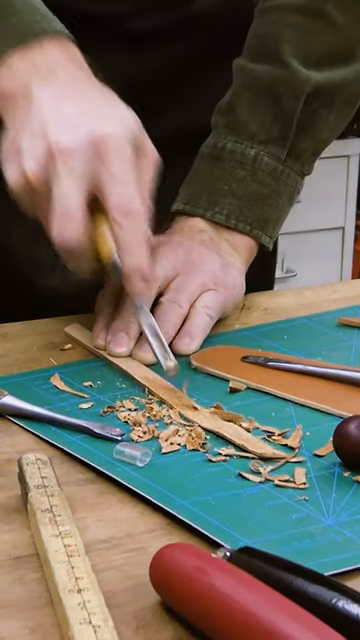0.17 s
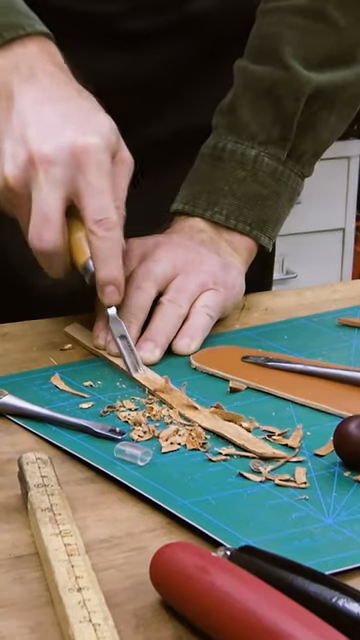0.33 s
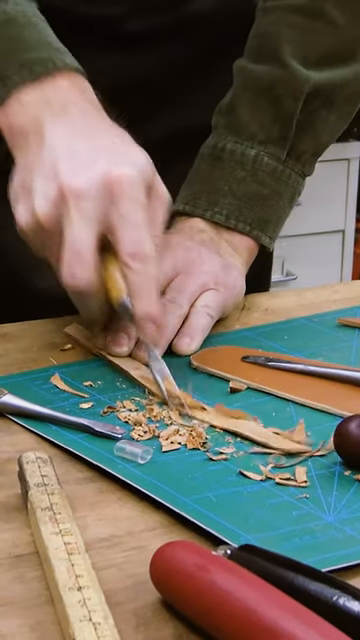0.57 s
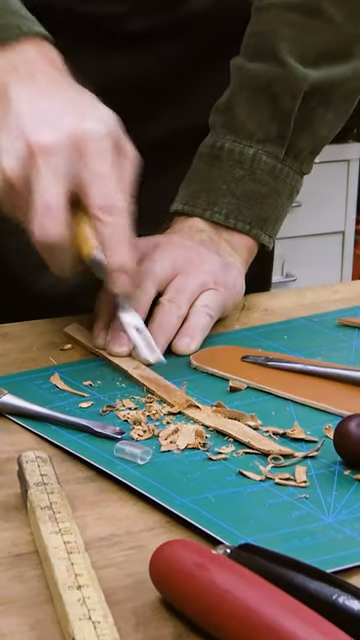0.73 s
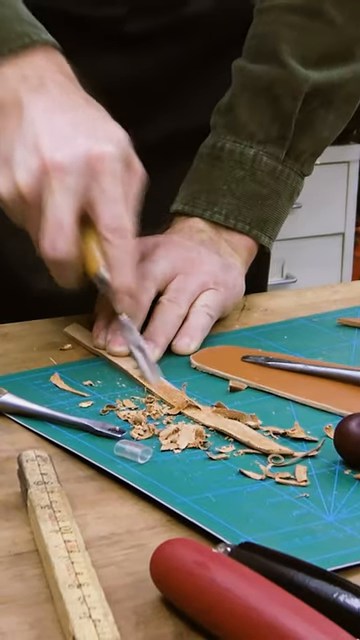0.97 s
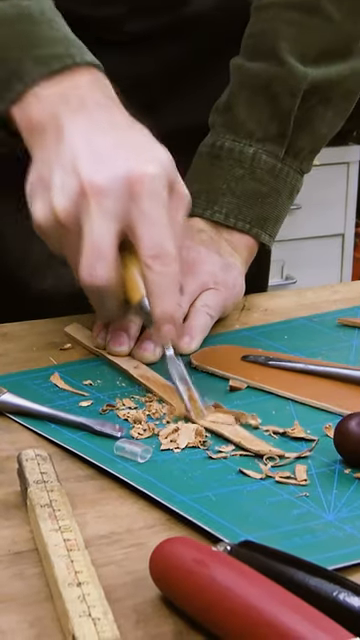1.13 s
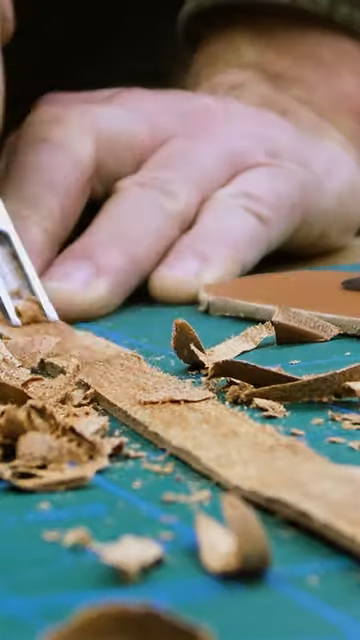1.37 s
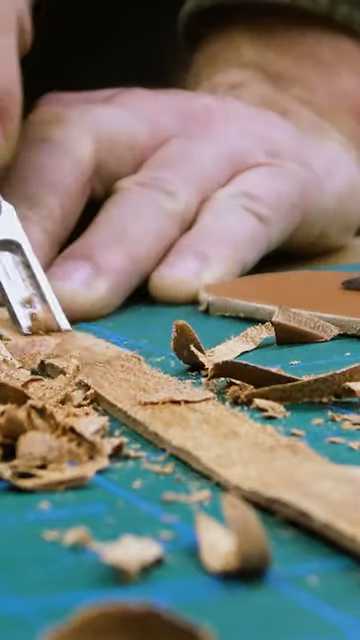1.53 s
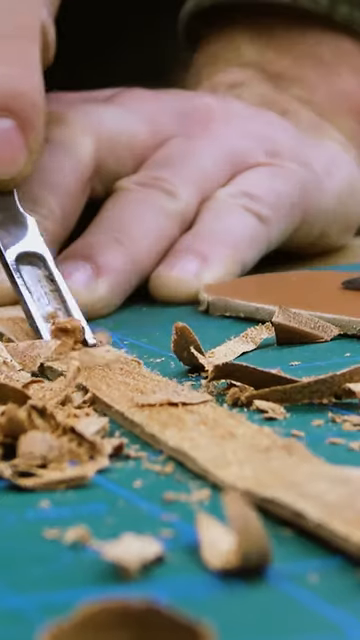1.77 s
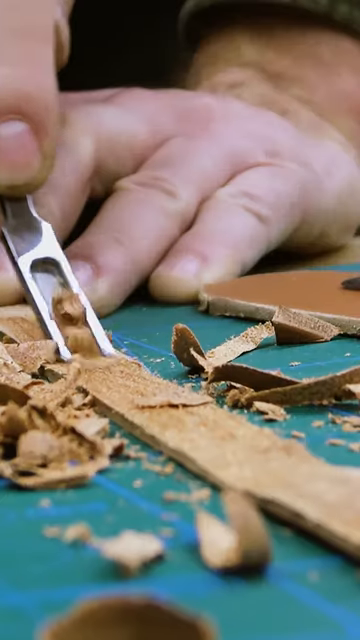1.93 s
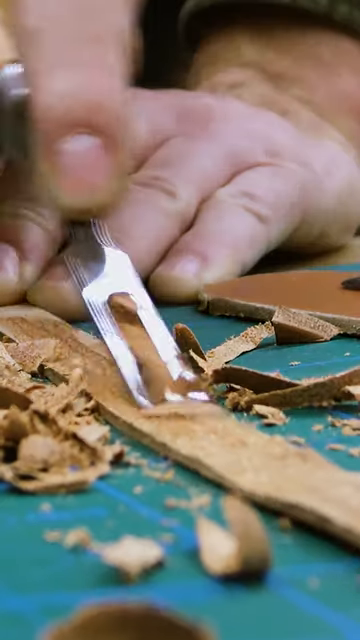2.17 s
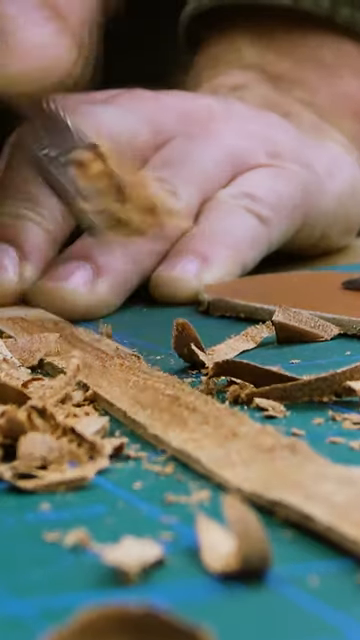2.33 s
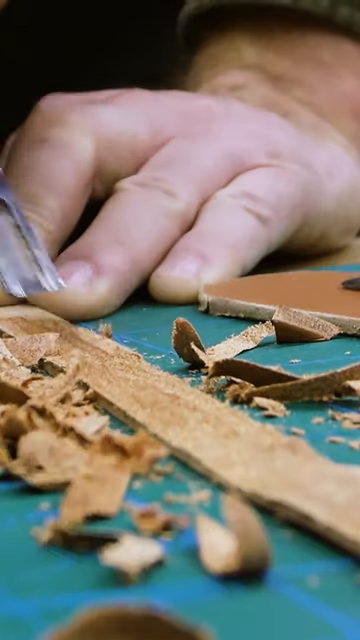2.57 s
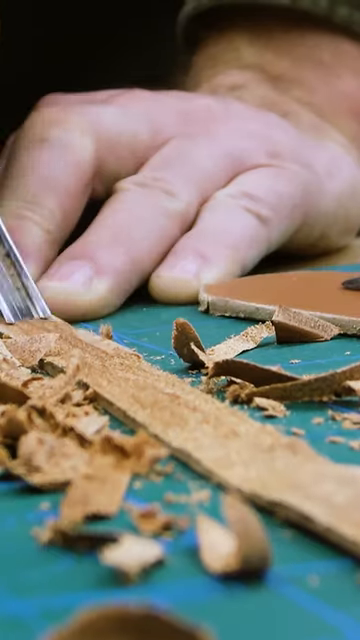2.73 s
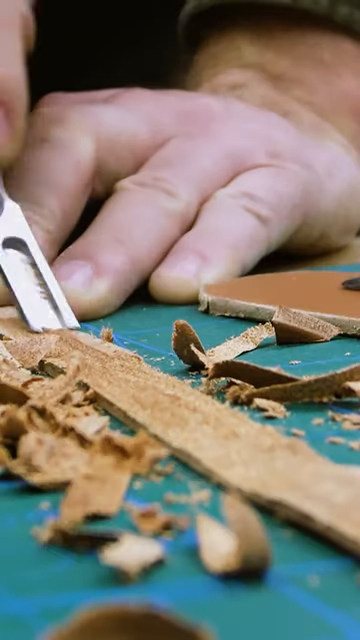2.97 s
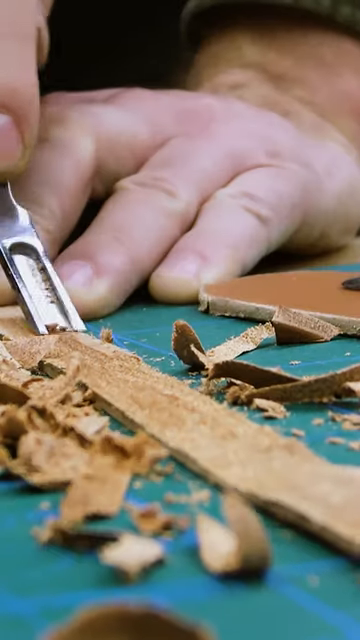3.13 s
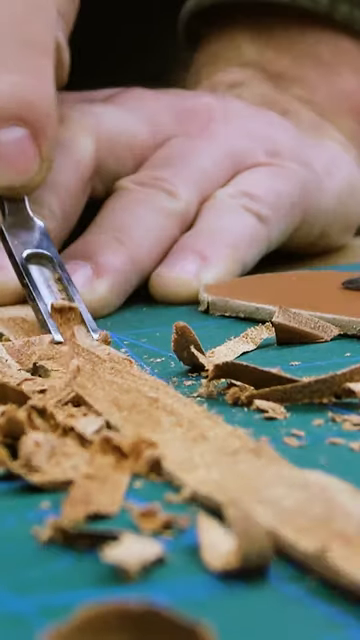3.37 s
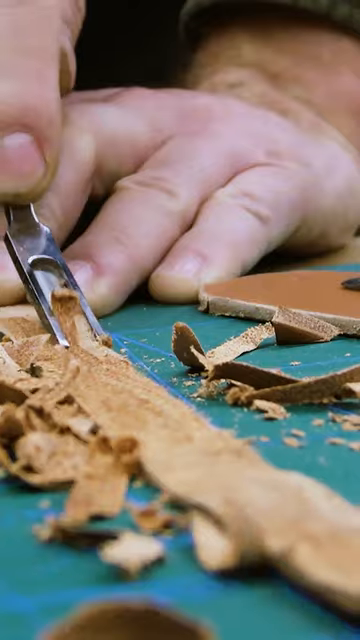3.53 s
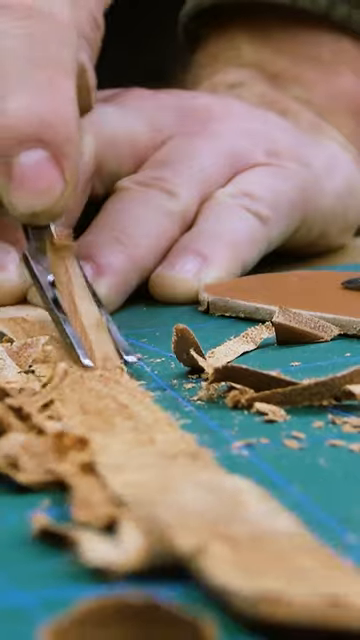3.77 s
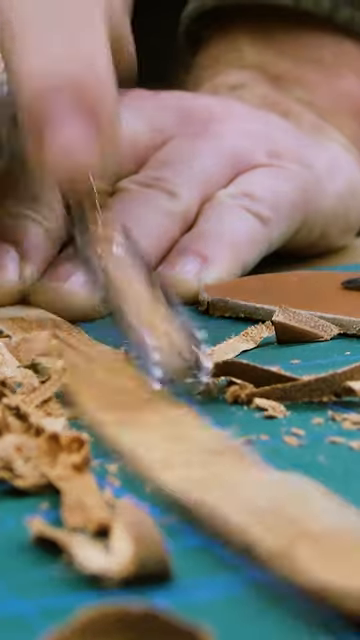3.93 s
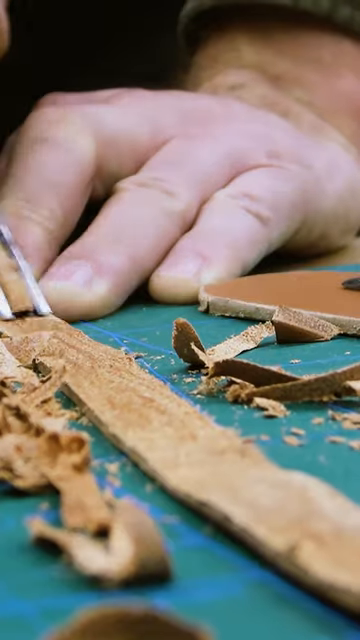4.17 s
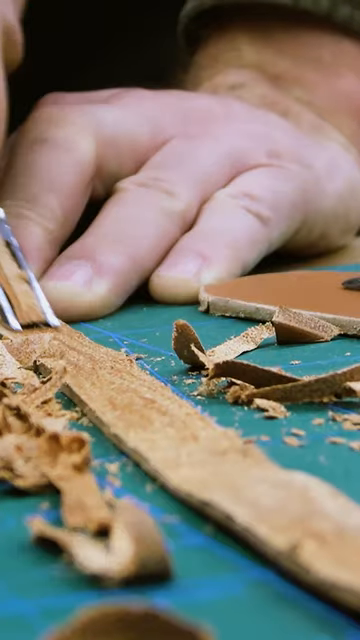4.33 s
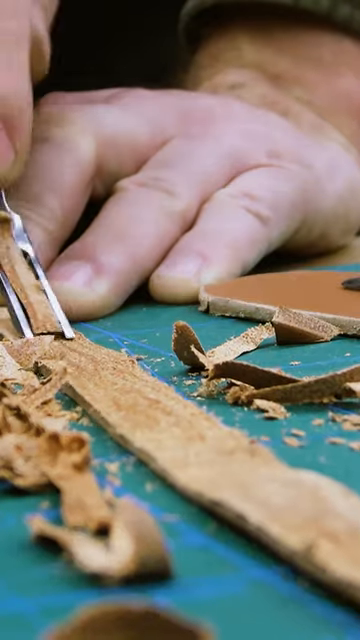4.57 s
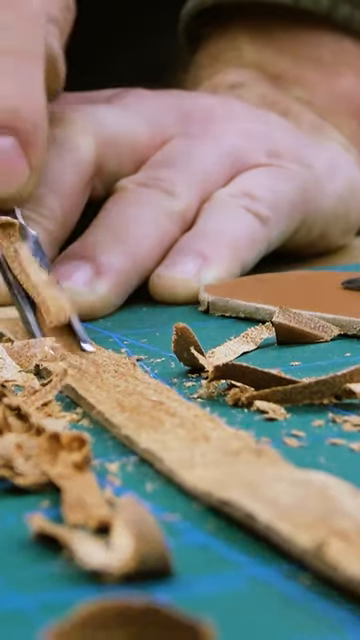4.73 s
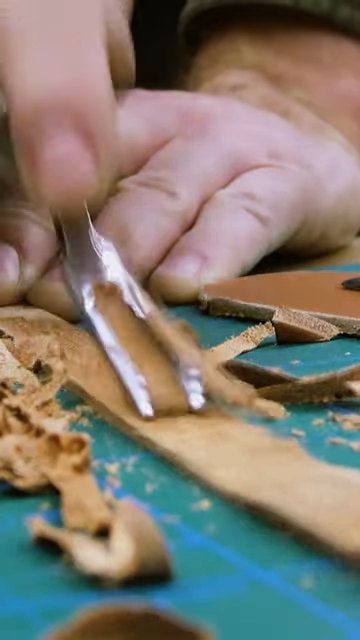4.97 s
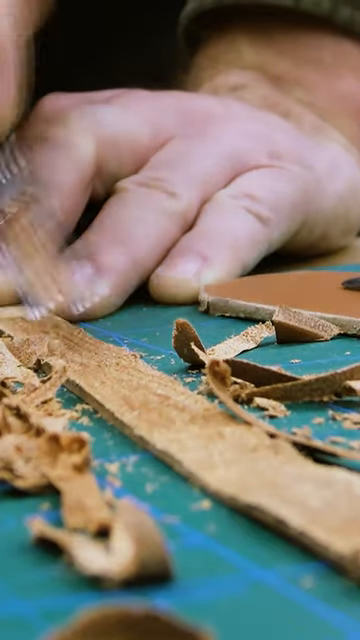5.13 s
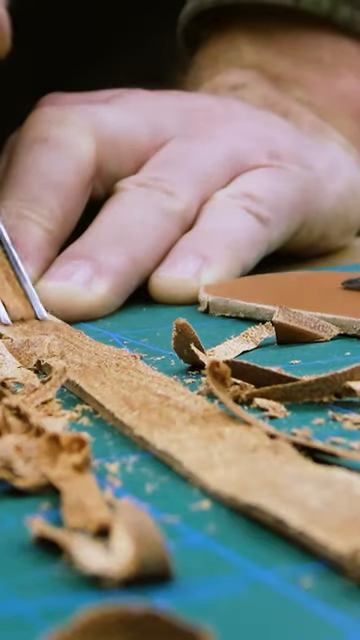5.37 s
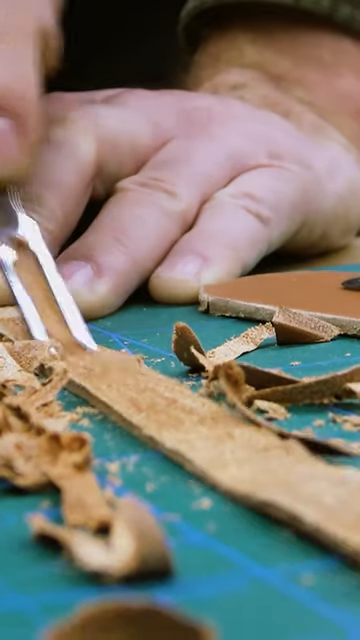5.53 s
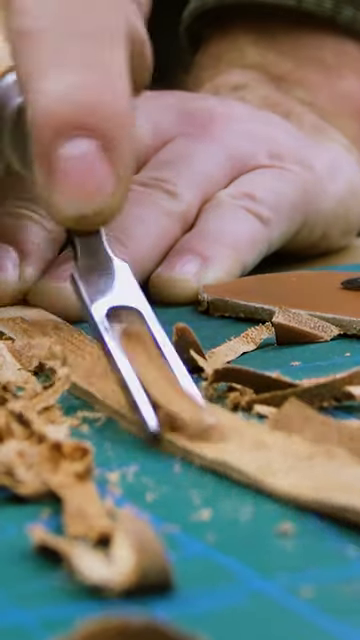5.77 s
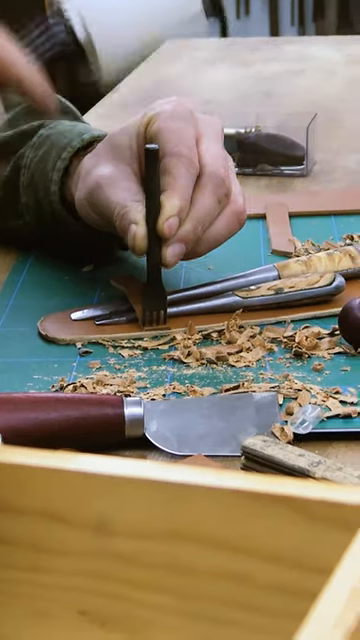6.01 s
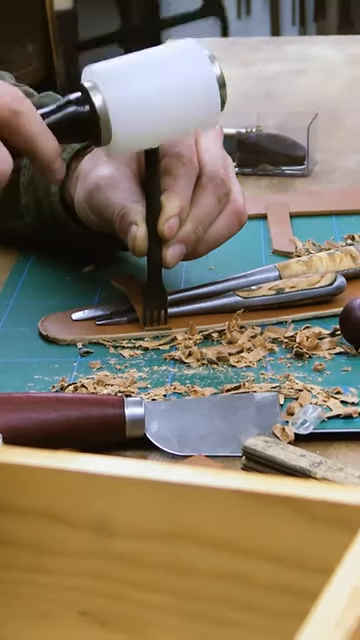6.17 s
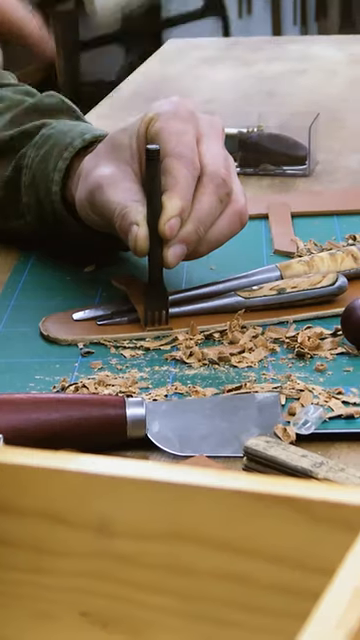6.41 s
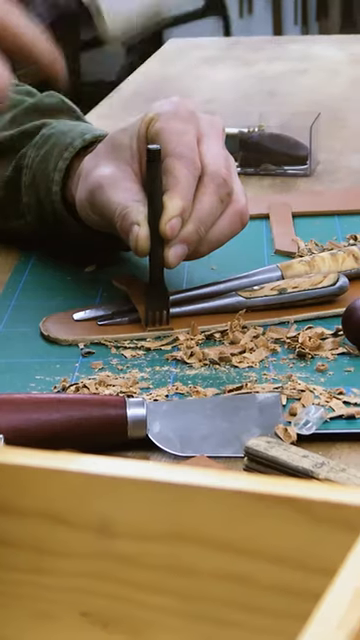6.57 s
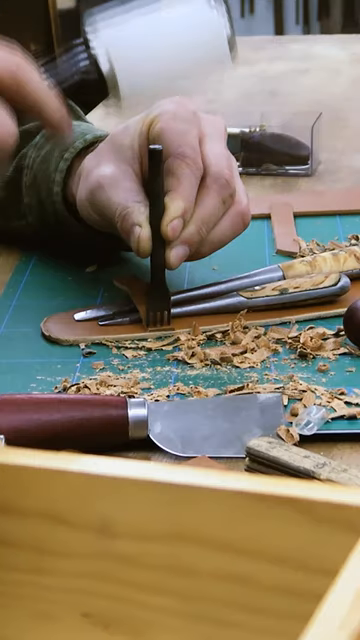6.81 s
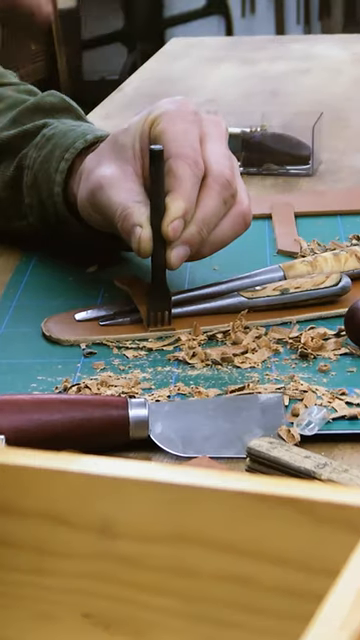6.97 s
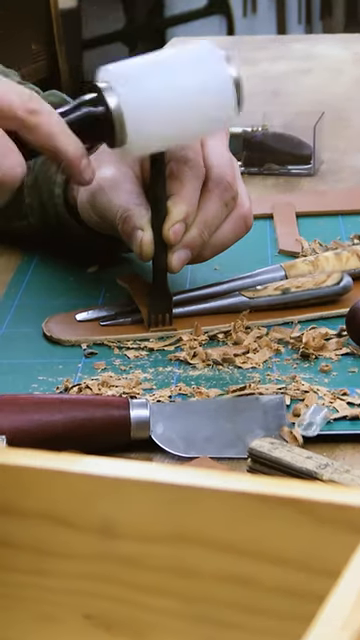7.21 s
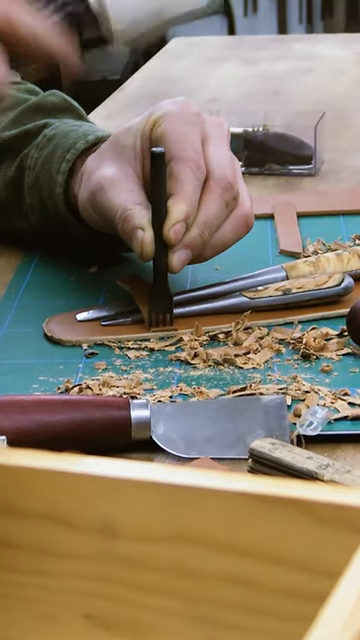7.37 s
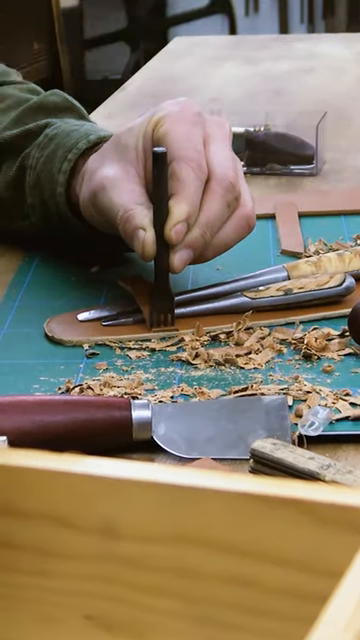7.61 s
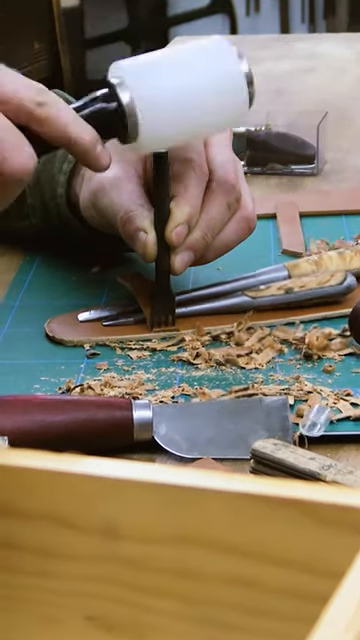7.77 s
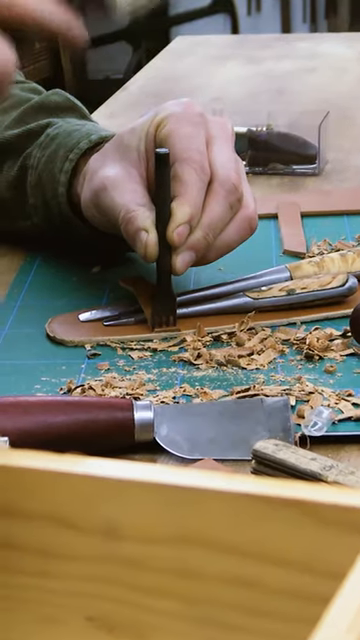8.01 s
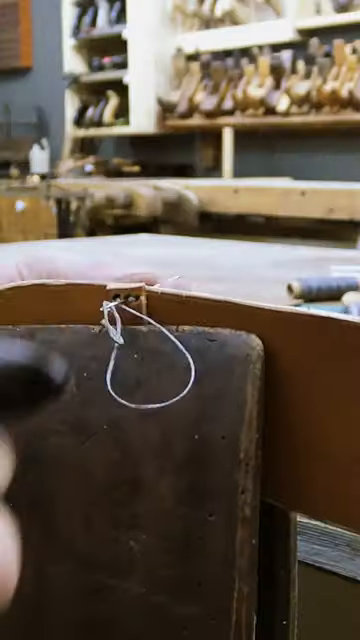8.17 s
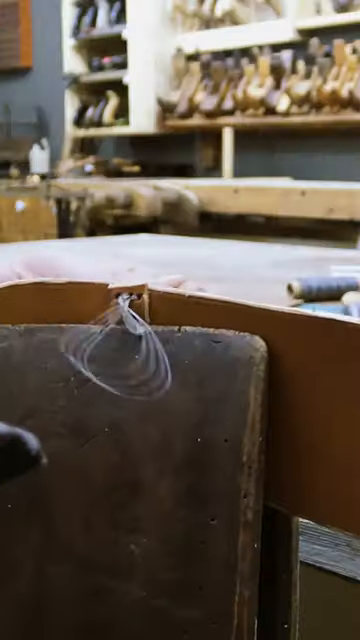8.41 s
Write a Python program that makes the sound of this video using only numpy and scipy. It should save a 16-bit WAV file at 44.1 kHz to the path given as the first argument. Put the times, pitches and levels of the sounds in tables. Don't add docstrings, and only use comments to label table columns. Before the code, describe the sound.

Three quick leather rasps and four longer, softer scrapes, then four increasingly hard mallet blows boom through a wooden bench with ringing steel tools.

```python
import sys
import numpy as np
from scipy import signal
from scipy.fft import rfft, irfft, next_fast_len
from scipy.io import wavfile
from scipy.ndimage import uniform_filter1d, minimum_filter1d, map_coordinates

SR = 44100
rng = np.random.default_rng(int(sys.argv[2]) if len(sys.argv) > 2 else 0)


def elevation(decibels):
    levels = np.asarray(decibels, float)
    return 10 ** (levels / 20)


def transcribe(signal):
    frames = np.atleast_2d(signal).T
    limited = np.clip(frames, -1, 1)
    pcm = np.round(limited * 32767).astype(np.int16)
    wavfile.write(sys.argv[1], SR, pcm)


N = 371763
REPEAT = round(.0532 * SR)


def unit(x):
    return x / np.sqrt(np.mean(x ** 2) + 1e-20)


def along(points, hz):
    f, v = np.transpose(points)
    return np.interp(np.log(hz + 1), np.log(f + 1), v)


def wobble(rate):
    at = np.arange(0, N + 32, 32)
    knots = rng.standard_normal(int(N * rate / SR) + 4)
    return np.interp(np.arange(N), at, map_coordinates(knots, [at * rate / SR]))


def add(track, s, x):
    part = track[round(s * SR):][:len(x)]
    part += x[:len(part)]


def room_tail():
    # frequency in Hz, t60 in seconds.
    decay = [(300, 1), (2000, 0.24), (8000, 0.2)]
    hz, t, z = signal.stft(rng.standard_normal(SR // 2), SR, nperseg=256)
    z = z * elevation(-60 * t / along(decay, hz)[:, None])
    tail = signal.istft(z, SR, nperseg=256)[1]
    return np.pad(tail / np.linalg.norm(tail), (130, 0))


def air():
    # frequency in Hz, level in dB.
    noise_colour = [(15, -47), (25, 3), (102, 1), (352, -1), (1150, -4.5), (1980, -8.5), (2330, -7),
                    (2520, -8), (3680, -8.5), (4450, -8), (14200, -14.5), (15800, -8.5)]
    # time in seconds, hush in dB, hiss in
    # dB.
    noise_steps = [(0, -52, -59), (2.7, -57.5, -59.5), (6.085, -57, -59.5), (6.09, -60.5, -59),
                   (8.24, -54, -59), (8.245, -57.5, -59), (8.43, -57, -55)]
    m = next_fast_len(N)
    hz = np.fft.rfftfreq(m, 1 / SR)
    z = rfft(rng.standard_normal(m)) * elevation(along(noise_colour, hz))
    low = 1 / (1 + (hz / 2200) ** 4)
    s, hush_db, hiss_db = np.transpose(noise_steps)
    t = np.arange(N) / SR
    hush = unit(irfft(z * low, m)[:N]) * elevation(np.interp(t, s, hush_db) + 2.3 * wobble(7.9))
    hiss = unit(irfft(z * (1 - low), m)[:N]) * elevation(np.interp(t, s, hiss_db))
    return hush + hiss


def steel():
    # start in seconds, frequency in
    # Hz, level in dB, rise in seconds, t60 in seconds.
    rings = [(6.18, 6430, -34, 0.0036, 0.11), (6.19, 8000, -40, .004, .12), (6.236, 6430, -30, .003, 0.087),
             (6.236, 8130, -36, .003, 0.14), (6.745, 6430, -28, 0.0053, 0.1),
             (6.797, 8100, -36, 0.0044, 0.27), (6.801, 8102, -58, .015, 1), (6.81, 6400, -39, .01, 0.22),
             (6.81, 11600, -63, .03, 1), (7.27, 8350, -44, .004, 0.56), (7.31, 6430, -28.5, 0.0074, 0.15),
             (7.319, 8350, -30, 0.0025, 0.43), (7.32, 11499, -45, .09, 0.67), (7.32, 11676, -43, 0.1, 0.93),
             (0.227, 4640, -46, .002, 0.23), (0.843, 4720, -49, .002, 0.22), (7.35, 7682, -42, .02, 0.51),
             (7.425, 7682, -41, 0.0091, 0.24), (7.85, 8349, -56, .01, 0.46),
             (7.919, 8349, -44.5, 0.018, 0.75), (8.045, 4716, -47, 0.025, 0.42),
             (7.34, 4716, -34, 0.042, 0.7),
        (7.41, 4716, -30, .04, .28),
    ]
    # start in seconds, frequency in Hz, level in dB, rise in seconds, t60 in seconds.
    room_modes = [(1.139, 70, -37, 0.026, 0.48), (3.83, 59, -34, .03, .3), (4.9, 58, -42, .04, .5),
                  (5.68, 59.7, -42, .05, .5), (6.2, 71.7, -32, 0.046, 0.73), (6.75, 70, -26, 0.064, 0.76),
                  (7.249, 70, -20.5, 0.18, 0.94), (7.85, 70.6, -25, 0.15, 1), (7.861, 112.5, -26, 0.11, 1)]
    out, t = np.zeros(N), np.arange(SR) / SR
    for s, hz, db, rise, t60 in rings + room_modes:
        envelope = elevation(db - 60 * t / t60) * (1 - np.exp(-t / rise))
        add(out, s, envelope * np.sin(2 * np.pi * hz * (s + t)))
    return out * elevation(1.0 * wobble(50))


def singing():
    # start in seconds, length in seconds, frequency in Hz, width in Hz, level in dB.
    sings = [(1.43, .14, 6050, 500, -60), (1.65, 0.093, 7000, 1000, -53), (1.696, 0.14, 8500, 150, -65),
             (1.86, 0.4, 7060, 600, -54), (2.93, 0.091, 6060, 500, -60), (3.28, 0.13, 7000, 900, -58),
             (3.6, 0.31, 6630, 900, -52), (4.405, 0.09, 7200, 700, -57), (4.42, 0.19, 1580, 90, -46),
             (4.56, .1, 7000, 500, -58), (4.682, 0.24, 7000, 700, -46), (4.743, 0.18, 960, 250, -38),
             (5.443, .11, 6100, 400, -56), (5.478, 0.065, 7560, 900, -54), (5.566, 0.14, 5950, 500, -49),
             (5.578, 0.17, 7340, 600, -48), (5.63, .3, 925, 250, -38), (5.935, 0.045, 850, 200, -49),
             (5.935, 0.061, 1560, 250, -46), (5.973, .07, 1890, 900, -51), (3.282, .4, 2880, 1510, -58),
             (4.7, 0.17, 3630, 1800, -49), (5.47, .12, 3000, 900, -53), (0.474, 0.19, 4500, 3000, -46),
             (6.016, 0.037, 850, 200, -51), (6.041, .038, 2220, 500, -55)]
    # start in seconds, length in seconds,
    # frequency in Hz, width in Hz, level in dB.
    swells = [(6.74, 0.15, 744, 130, -25), (7.222, 0.035, 6450, 600, -36), (7.3, .17, 740, 94, -28.5),
              (7.33, 0.13, 295, 67, -30), (7.86, .09, 390, 54, -24), (7.9, 0.14, 291, 38, -24.5),
              (7.88, .16, 568, 90, -24.5), (7.9, 0.032, 7400, 250, -46), (7.3, 0.034, 8000, 250, -40),
              (8.1, .14, 252, 52, -38), (8.03, 0.11, 316, 29, -33), (6.86, .13, 1130, 1100, -40),
              (6.85, .13, 590, 150, -36), (7.24, .1, 1050, 330, -34)]
    rise, fall = 0.33, 0.1
    out = np.zeros(N)
    for s, length, hz, width, db in sings + swells:
        u = np.arange(round(length * SR)) / (length * SR)
        rub = rng.standard_normal(SR // 2) * elevation(6.4 * rng.standard_normal(SR // 2))
        band = [hz - width / 2, hz + width / 2]
        rub = signal.sosfilt(signal.butter(2, band, "band", fs=SR, output="sos"), rub)
        envelope = np.clip(np.minimum(u / rise, (1 - u) / fall), 0, 1)
        add(out, s, elevation(db) * unit(rub)[-len(u):] * envelope)
    return out


def tap(hz, t60, wide):
    t = np.arange(1024) / SR
    modes = np.sin(2 * np.pi * hz * t) + 0.36 * np.sin(2 * np.pi * 1.19 * hz * t)
    scuff = 0.46 * rng.standard_normal(len(t))
    push = elevation(-60 * t / t60) * (1 - np.exp(-t / 0.00031)) * (modes + scuff)
    band = [hz / wide, min(1.37 * hz * wide, 20000)]
    ring = signal.sosfilt(signal.butter(3, band, "band", fs=SR, output="sos"), push)
    return ring / np.abs(ring).max()


def tool_hops():
    # start in seconds, peak in dB, frequency in Hz, t60 in seconds.
    hops = [(6.176, -29, 2440, 0.0075), (4.205, -43, 2500, .006), (4.205, -39, 550, .02),
            (4.258, -44, 2400, .006), (6.177, -26, 900, .012), (6.184, -24, 796, 0.01),
            (6.8014, -27, 3300, .008), (7.279, -12, 3080, .008), (7.2967, -27, 3200, .01),
            (7.353, -20, 3400, 0.0066), (7.3935, -16, 3030, 0.0092), (7.411, -16, 3100, 0.0087),
            (7.896, -24, 2440, .012), (7.914, -14, 2520, 0.014), (7.952, -18.5, 2450, .01),
            (7.9706, -19.5, 2550, .01)]
    out = np.zeros(N)
    for s, db, hz, t60 in hops:
        add(out, s, elevation(db) * tap(hz, t60, wide=1.4))
    return out


def light_contacts():
    # start in seconds, peak in dB, frequency in Hz, t60 in seconds, room in dB.
    knocks = [(0.401, -43, 1470, .008, -12), (0.6348, -10, 1710, 0.003, -6),
              (0.6865, -2.5, 1760, 0.0035, -7.5), (.6897, -13, 1700, 0.0068, -16),
              (.6976, -13, 1640, 0.0033, -14), (3.383, -29, 910, .008, -10), (2.513, -38, 1450, .01, 2),
              (0.918, -30, 1470, 0.0049, -10), (0.97, -24.5, 1470, 0.0067, -2),
              (2.349, -22.5, 1460, 0.012, -21), (2.401, -27.5, 1520, 0.016, -8),
              (2.756, -39, 1510, 0.0098, -19), (2.808, -43, 1470, 0.018, -5),
              (4.205, -30, 1370, 0.015, -15), (4.258, -34, 1470, 0.011, 0), (4.953, -29, 1530, 0.0055, 3),
              (5.027, -27, 1510, 0.011, -7), (5.083, -31, 1530, 0.017, -7), (5.938, -33, 1520, 0.0088, -2)]
    # start in seconds, peak in dB, frequency in Hz, t60 in seconds, room in dB.
    tinks = [(0.227, -16, 4830, 0.0015, 3), (0.7901, -24, 4690, 0.003, 5), (0.843, -22, 4800, 0.0026, 2.3),
             (8.1708, -34, 6200, 0.0058, 1.5), (8.1908, -38, 3450, .006, 1), (8.224, -35.5, 3800, .008, 3),
             (8.1908, -39, 7200, 0.017, -4), (8.224, -35.0, 5800, 0.0068, 3)]
    # start in seconds, peak in dB, frequency in Hz, t60 in seconds, room in dB.
    snaps = [(0.5064, -26, 2780, 0.0066, 2), (0.61, -13, 1270, 0.0076, -4), (3.843, -38, 7000, .004, -2),
             (3.896, -27, 5750, 0.0025, -0.5), (4.897, -36, 6500, 0.003, -8), (4.95, -33, 6200, 0.0024, -4),
             (.6348, -20.5, 6700, 0.0024, -8), (.6865, -22, 5000, .003, -11),
             (2.1696, -35, 7300, 0.0024, -3), (3.3808, -39, 4800, 0.0024, -6), (2.1, -40, 6900, .004, -5),
             (4.7288, -41, 7010, .003, -6), (2.401, -47, 2200, .004, -8), (.97, -38, 2000, .004, -6),
             (5.4435, -46, 5900, .004, -5)]
    out = np.zeros(N)
    for rows, edge_db, wide, broad in ((knocks, -5, 1.3, 2), (tinks, -17, 1.13, 1.15), (snaps, -6, 1.2, 2.4)):
        for s, db, hz, t60, room_db in rows:
            edge = elevation(edge_db) * tap(1.38 * hz, 0.64 * t60, broad)
            x = elevation(db + 1.5 - max(room_db, 0) * 3.0) * (tap(hz, t60, wide) + edge)
            add(out, s, x)
            add(out, s, elevation(room_db) * signal.fftconvolve(x, room_tail()))
    out[round(6.085 * SR):round(6.17 * SR)] = 0
    return out


def mallet_cracks():
    # start in seconds, peak in dB, frequency in Hz, t60 in seconds, brightness in dB.
    cracks = [(6.173, -14, 1920, .015, -34), (6.225, -11, 2660, 0.0091, -26),
              (6.7245, -14.5, 1850, 0.013, -26), (6.777, -12.5, 2990, 0.0061, -13),
              (7.217, -2, 1870, 0.0074, -6), (7.2172, -7, 4070, .004, -30), (7.217, -18, 6300, .004, -30),
              (7.269, -8, 3380, .006, -3), (7.3182, -15, 3100, 0.008, -14), (7.8127, -2, 1830, 0.0032, -6),
              (7.8132, -18, 4150, .004, -30), (7.864, -9, 2650, 0.0085, -6), (7.864, -19, 7000, .003, -30)]
    out = np.zeros(N)
    for s, db, hz, t60, bright_db in cracks:
        edge = tap(5700, 0.0012, wide=2.5) + elevation(-12) * tap(12900, 0.00066, wide=1.3)
        add(out, s, elevation(db) * (tap(hz, t60, wide=1.8) + elevation(bright_db) * edge))
    return out


def grit(rate, spread_db, smooth, lumpy_db, patchy_db, again):
    size = elevation(spread_db * np.minimum(rng.exponential(size=N), 2))
    slips = (rng.random(N) < rate / SR) * size * rng.standard_normal(N)
    z = signal.stft(unit(slips) + smooth * rng.standard_normal(N), nperseg=512)[2]
    field = rng.standard_normal(z.shape)
    for _ in range(2):
        field = uniform_filter1d(field, size=7, axis=0)
        field = uniform_filter1d(field, size=9, axis=1)
    depth = np.clip(np.arange(len(z)) / 40, .3, .6)[:, None]
    x = signal.istft(z * elevation(patchy_db * depth * unit(field)), nperseg=512)[1][:N]
    x = x * elevation(lumpy_db * (0.06 * wobble(13) + wobble(45)))
    x = x + elevation(-8.0) * signal.fftconvolve(x, room_tail())[:N]
    return x - again * np.roll(x, REPEAT)


def body(drive, colour, modes, broad):
    edges = [0, 235, 800, 1900, 4700, 8800, 22050]
    f = np.fft.rfftfreq(next_fast_len(N + 8192), 1 / SR)
    peaks = sum(elevation(db) * 1j * f * w / (c * c - f * f + 1j * f * w) for c, w, db in modes)
    z = rfft(drive, 2 * len(f) - 2) * elevation(along(colour, f)) * (broad + peaks)
    below = [1 / (1 + (f / (edge + 1)) ** 6) for edge in edges]
    bands = [irfft(z * (hi - lo))[:N] for lo, hi in zip(below, below[1:])]
    bass, low, high, tear, hiss, top = bands
    chatter = elevation(1.45 * wobble(75))
    tear, hiss, top = tear * np.sqrt(chatter), hiss * chatter, top * chatter
    low, high = unit(np.array([low, high])) / np.sqrt(2)
    return [unit(bass), low, high, unit(tear), hiss / hiss.std(), top / hiss.std()]


def played(layers, rows, fade, loud_db):
    s, main_db, tear_db, hiss_db, bass_db, tilt_db = np.transpose(rows)
    span = np.arange(max(0, round((s[0] - .003) * SR)), round((s[-1] + .002) * SR))
    slack = main_db - loud_db
    tilt = fade[0] * slack + tilt_db
    rels = (bass_db, -tilt, tilt, tear_db, hiss_db, hiss_db + fade[1] * slack)
    swell = np.minimum(np.arange(len(span)) / 60, 1)
    out = np.zeros(N)
    for x, rel in zip(layers, rels):
        out[span] += swell * x[span] * elevation(np.interp(span / SR, s, main_db + rel))
    return out


def blow_rows(s, over_db, crack_db, rattle_db, bass_db, end):
    held_db, knee_db = -17, 2.5
    first_db_s, echo_db, fall_db_s = 232, 0.5, 149.5
    tail_db, tail_db_s = -34, 67
    crack_db_s, rattle_db_s, bass_db_s = -26, -66, 44.5
    thud_db, thud_s = 7.5, 0.044
    shake_db, dull_db = -8, -4.5
    snap, snap_s = 0.091, 0.091
    t = np.arange(0, end - s, 1 / 500)
    late = t - REPEAT / SR
    direct = elevation(-2 * first_db_s * t) + (late > 0) * elevation(2 * (echo_db - fall_db_s * late))
    raw = over_db + 10 * np.log10(direct + elevation(2 * (tail_db - tail_db_s * t)))
    held = held_db - knee_db * np.logaddexp(0, -raw / knee_db)
    crack = crack_db + crack_db_s * t + dull_db * (late < 0)
    rattle = rattle_db + rattle_db_s * t + shake_db * (late < 0)
    bass = bass_db + bass_db_s * t + thud_db * np.exp(-t / thud_s)
    tilt = snap * over_db * np.exp(-t / snap_s)
    return np.transpose([s + t, held, crack, rattle, bass, tilt])


def booms():
    # start in seconds, strength over the limiter in dB,
    # then crack, rattle and bass over the bench in dB.
    blows = [
        (6.175, 1, -9, -17.5, -9),
        (6.727, 11.9, -12.5, -17.5, -15),
        (7.2197, 24.7, -9, -12.5, -17.5),
        (7.8162, 27.2, -7.5, -17, -22),
    ]
    ends = [6.7, 7.195, 7.79, 8.24]
    # centre in Hz, width in Hz, level over the broad colour in dB.
    bench_modes = [(70, 4.8, 7), (115.5, 3.5, 15), (173, 64, 0.5), (229, 6.3, 7), (283, 11.7, 8.5),
                   (371, 14, -6), (580, 100, -5.5), (690, 9.6, 1), (914, 11, -5), (12500, 3500, -4)]
    # centre in Hz, width in Hz, level in dB.
    iron_modes = [
        [(6430, 320, 6), (1500, 440, 2.5), (2600, 1900, 5)],
        [(1620, 990, -3.5), (3720, 550, -4)],
        [(2230, 290, 6), (3100, 380, 18.5), (3330, 180, 16), (6430, 330, -1)],
        [(1786, 950, -15), (2580, 420, 11.5), (3300, 880, 0)],
    ]
    # frequency in Hz, level in dB.
    soft_colour = [(18, -73), (30, -37), (56, -15.5), (183, -3.5), (523, -2.5), (735, -2.5), (1700, -11),
                   (2400, -18.5), (5390, -26), (6480, -27), (7390, -30), (8200, -27.5), (15800, -76)]
    # frequency in Hz, level in dB.
    hard_colour = [(18, -65), (30, -39), (59, -10.5), (214, -4), (251, -5.5), (286, -3.5), (459, -9),
                   (755, -5), (1210, -10), (2000, -18.5), (3600, -29.5), (3900, -32.5), (7200, -37.5),
                   (8640, -39), (9350, -44.5), (15800, -76)]
    shake = grit(3000, 0.99, 1.18, lumpy_db=1.44, patchy_db=3, again=0.081)
    colours = (soft_colour, soft_colour, hard_colour, hard_colour)
    shaken = np.zeros(N)
    for row, end, colour, iron in zip(blows, ends, colours, iron_modes):
        layers = body(shake, colour, bench_modes + iron, broad=1.5)
        shaken += played(layers, blow_rows(*row, end), (.03, .4), loud_db=7)
    return signal.sosfilt(signal.butter(2, 110, "high", fs=SR, output="sos"), shaken)


def stroke_rows(tables, cuts, loud_db):
    lingers = 0.18
    return [(s, db, bite, speed, bass - lingers * (db - loud_db), 0)
            for rows, bass in zip(tables, cuts) for s, db, speed, bite in rows]


def strokes():
    # time in seconds, pressure as bench level in dB,
    # edge speed as hiss over bench in dB, bite as tearing over bench in dB.
    quick_strokes = [
        [(0.0, -26.5, -21, -13), (0.016, -31, -12.5, -10.5), (0.04, -27.5, -12.5, -7.5), (0.11, -23.5, -12, -5),
         (0.174, -28, -21, -13.5), (0.22, -36, -23, -8), (0.228, -39, -19, -5.5), (0.326, -50.5, -15, -13),
         (0.38, -57, -20, -17)],
        [(0.38, -54.5, -22, -12.5), (0.576, -23, -15, -7.5), (0.694, -28.5, -14, -4), (0.78, -42.5, -19, -4),
         (0.8, -44, -16, -7), (0.834, -47.5, -28, -6), (0.844, -51.5, -11, 4), (0.91, -57, -14, -9),
         (0.92, -49.5, -18, -4)],
        [(0.95, -50.5, -12, -14), (0.974, -45.5, -27, -9), (0.996, -45.5, -16, -8), (1.054, -33.5, -11, -6.5),
         (1.122, -25.5, -15, -4.5), (1.172, -25, -14, -6.5), (1.238, -35.5, -24, -7.5), (1.36, -47.5, -26, -18),
         (1.37, -68, -16, -21)],
    ]
    # time in seconds, pressure as bench level in dB,
    # edge speed as hiss over bench in dB, bite as tearing over bench in dB.
    long_strokes = [
        [(1.37, -67, -12, -25), (1.522, -36, -16, -17), (1.624, -35, -22.5, -11.5), (1.69, -30.5, -17.5, -15.5),
         (1.814, -30.5, -21, -13.5), (2.096, -30, -18, -14), (2.312, -30.5, -21, -13.5),
         (2.458, -51.5, -31, -24), (2.62, -75, -4, -3)],
        [(2.85, -75, -12, -10), (2.99, -38, -16.5, -16), (3.086, -36.5, -28, -12), (3.112, -43, -27, -12.5),
         (3.572, -34.5, -18.5, -19), (3.712, -27.5, -23, -18.5), (3.842, -26.5, -15.5, -15),
         (3.942, -37, -31, -11.5), (4.18, -66, -24, -24)],
        [(4.33, -61, -7, -19), (4.466, -38, -15.5, -12), (4.596, -39, -21, -18), (4.76, -27.5, -19.5, -16),
         (4.938, -26, -18.5, -10), (5.052, -40.5, -29, -11), (5.176, -56, -22, -19), (5.338, -58, -19, -19),
         (5.36, -66, -11, -10)],
        [(5.36, -70, -13, -3), (5.372, -58, -15, -18), (5.51, -36, -19, -14), (5.654, -29, -15, -12),
         (5.796, -29, -14.5, -10.5), (5.922, -45, -23, -16), (6.068, -54.5, -23, -6), (6.08, -54, -15, -22),
         (6.085, -72, -14, -7)],
    ]
    quick_bass = [-22, -18.5, -22.5]
    long_bass = [-14, -9.5, -13, -16.5]
    # centre in Hz, width in Hz, level over the broad colour in dB.
    quick_modes = [(367, 88, -5), (727, 12, 7.5), (1022, 33, -2), (1260, 52, 4.5), (1470, 56, 8),
                   (1878, 31, 1), (4930, 3400, -13), (6870, 1000, 5.5), (12100, 3400, 1)]
    # centre in Hz, width in Hz, level over the broad colour in dB.
    long_modes = [(359, 33, -3.5), (701, 58, -3), (964, 19, -6.5), (1380, 21, 0), (1530, 32, 5.5),
                  (2860, 650, -10.5), (3950, 640, -7), (5850, 430, -9), (7000, 610, -11), (8350, 210, -16),
                  (10600, 990, 3), (12300, 1800, 1)]
    # frequency in Hz, level in dB.
    quick_colour = [(18, -67), (30, -47), (59, -24), (209, -10), (294, -5.5), (447, -6), (716, -2),
                    (1010, 1), (1890, -19), (2520, -24), (6830, -43), (8640, -41), (15800, -66)]
    # frequency in Hz, level in dB.
    long_colour = [(18, -63), (30, -34.5), (161, -5), (258, -5), (362, -1), (581, -1), (680, 1), (907, 1),
                   (981, 3), (1240, 0), (1570, -3), (1750, -7.5), (4100, -20), (5000, -23), (7200, -19),
                   (8500, -26), (9000, -33), (15800, -49)]
    # time in seconds, half length in seconds, change in
    # dB.
    level_bumps = [(0.685, 0.0044, -10), (.19, .02, 0.5), (0.293, .04, 1), (1.112, .012, 1.5),
                   (1.626, .012, -2.5), (1.87, .04, -3), (2.02, .05, 1.5), (2.257, .01, 2.5), (2.37, 0.026, 0),
                   (3.22, 0.0083, -5.5), (3.297, 0.075, 2), (3.755, 0.042, -2), (4.43, .04, 1.5),
                   (4.86, .03, 2), (5.428, 0.013, -8), (5.543, 0.01, -3.5), (5.837, 0.019, 0.5),
                   (5.932, .01, 0)]
    quick_grit = grit(4000, 1.9, 1.56, lumpy_db=0.6, patchy_db=4, again=0.086)
    long_grit = grit(4000, 1.5, 2.1, lumpy_db=1.0, patchy_db=2.5, again=.25)
    quick = body(quick_grit, quick_colour, quick_modes, broad=0.9)
    long = body(long_grit, long_colour, long_modes, broad=0.96)
    quick = played(quick, stroke_rows(quick_strokes, quick_bass, loud_db=-23), (.03, .3), loud_db=7)
    long = played(long, stroke_rows(long_strokes, long_bass, loud_db=-26.0), (.03, .4), loud_db=7.0)
    t = np.arange(N) / SR
    bumps = elevation(sum(db * np.exp(-((t - s) / half) ** 2) for s, half, db in level_bumps))
    return bumps * (quick + long)


def scene():
    cut = np.clip((8.241 * SR - np.arange(N)) / 90, 0, 1)
    contacts = light_contacts() + mallet_cracks() + tool_hops()
    bench = strokes() + booms() + contacts + steel() + singing()
    return (bench * cut + air())[None]


def low_pass(x):
    return signal.sosfilt(signal.butter(12, 15790, fs=SR, output="sos"), x)


def record(dry):
    ceiling = .43
    m = next_fast_len(N)
    hz = np.fft.rfftfreq(m, 1 / SR) + 1
    no_bass = 1 / (1 - 1j * 45 / hz) ** 2
    no_top = 1 / (1 + (hz / 15750) ** 60) / (1 + (hz / 15500) ** 8)
    x = irfft(rfft(dry, m) * no_bass * no_top, m)[:, :N]
    duck = minimum_filter1d(ceiling / np.maximum(np.abs(x), ceiling), size=61)
    return low_pass(x * uniform_filter1d(duck, size=61))


dry = scene()
out = record(dry)
transcribe(out)
```